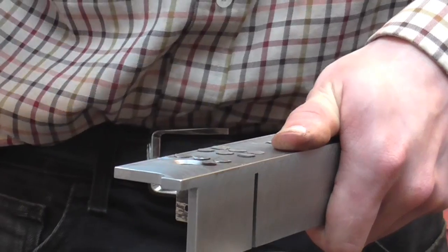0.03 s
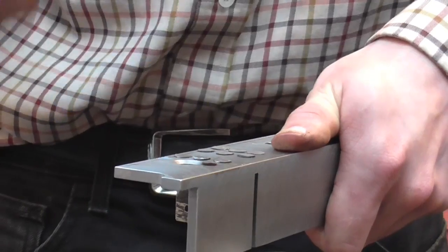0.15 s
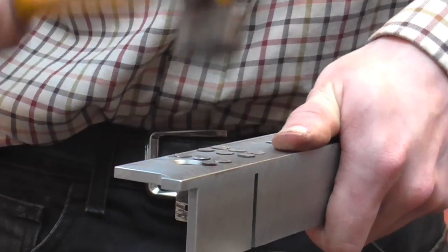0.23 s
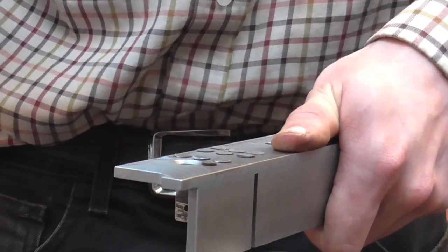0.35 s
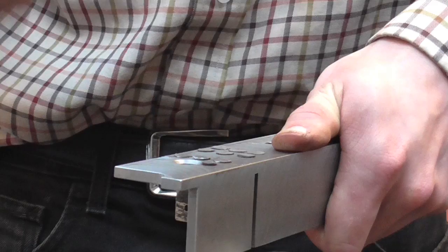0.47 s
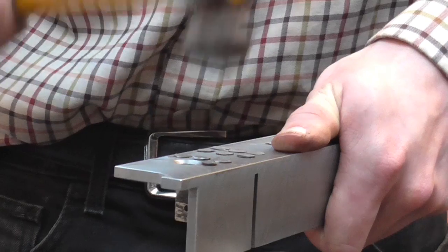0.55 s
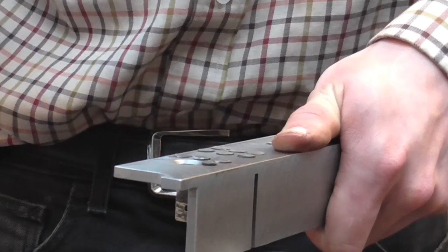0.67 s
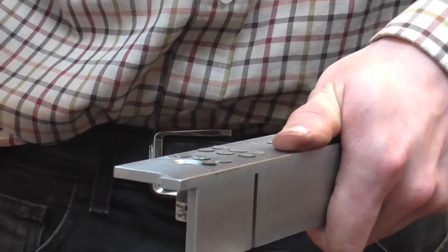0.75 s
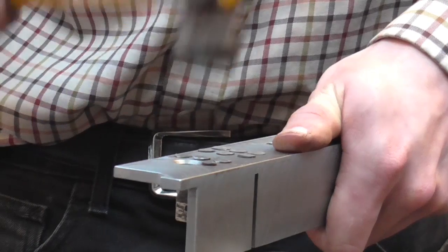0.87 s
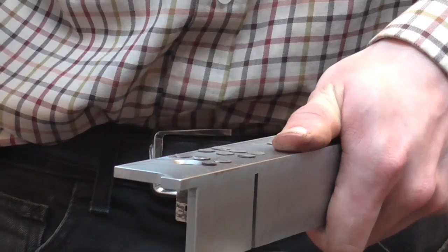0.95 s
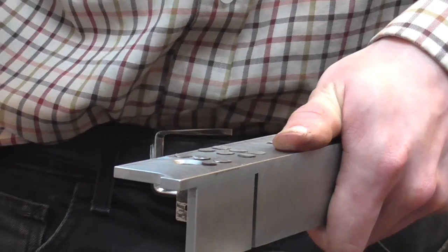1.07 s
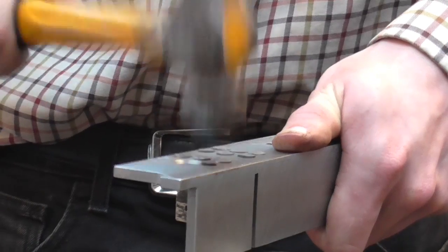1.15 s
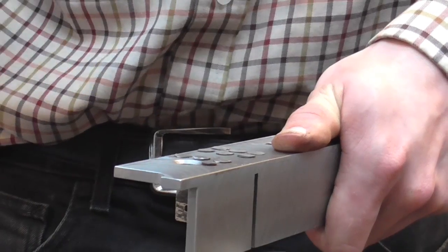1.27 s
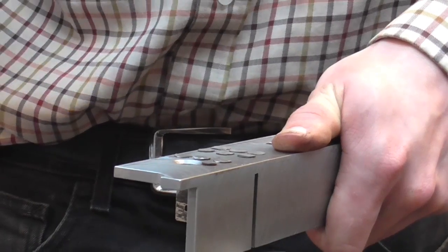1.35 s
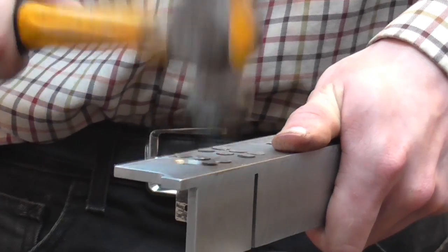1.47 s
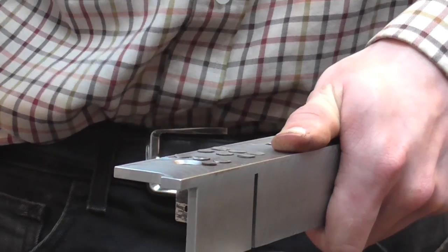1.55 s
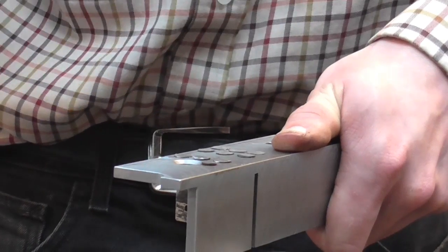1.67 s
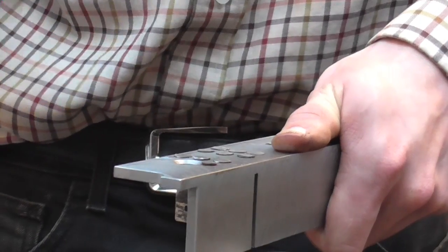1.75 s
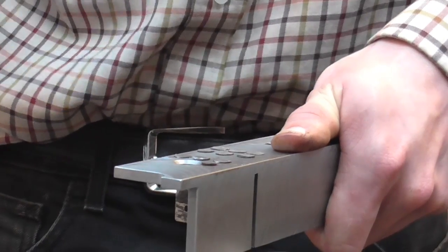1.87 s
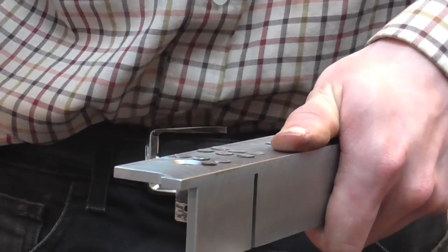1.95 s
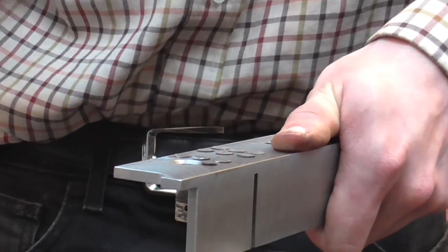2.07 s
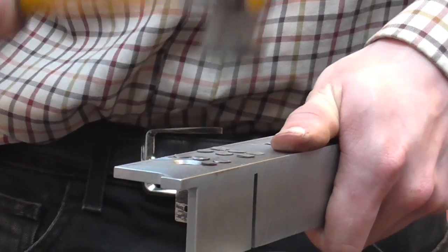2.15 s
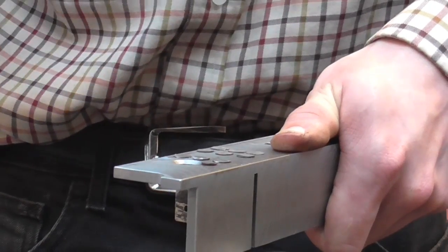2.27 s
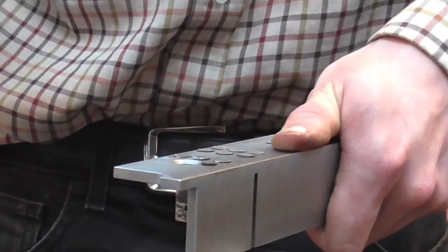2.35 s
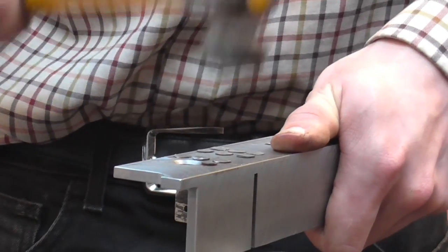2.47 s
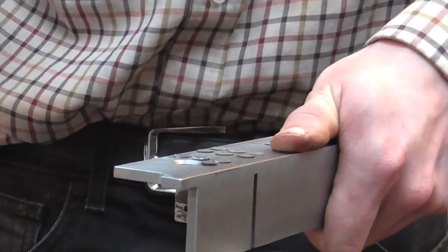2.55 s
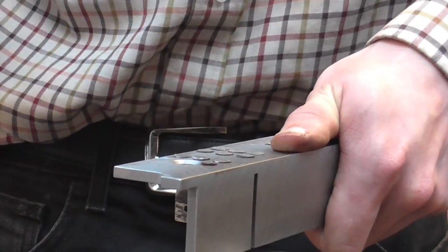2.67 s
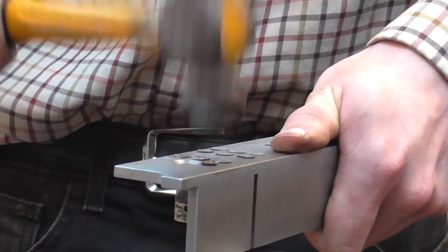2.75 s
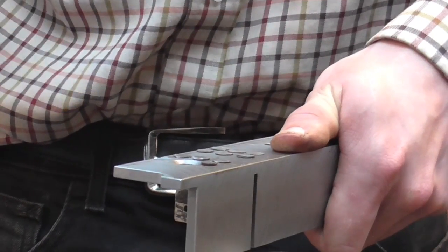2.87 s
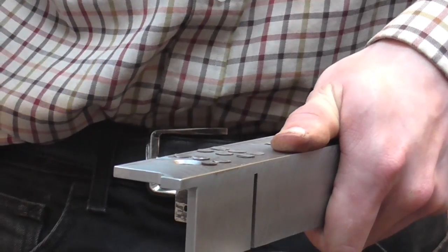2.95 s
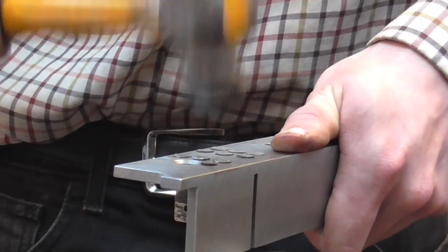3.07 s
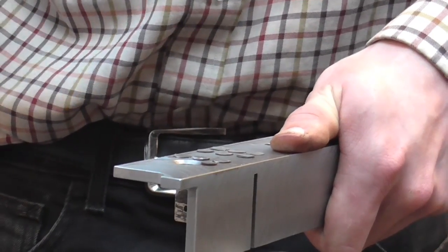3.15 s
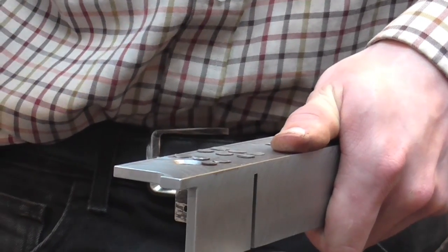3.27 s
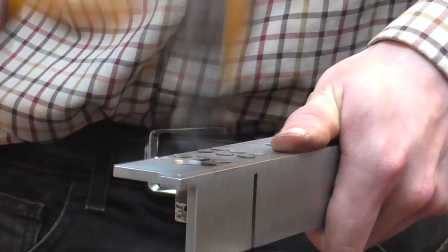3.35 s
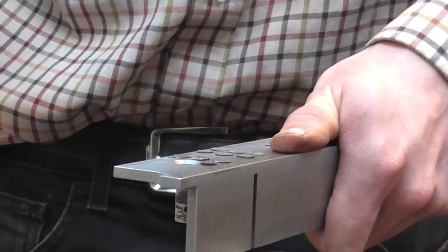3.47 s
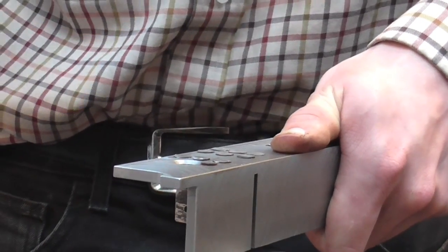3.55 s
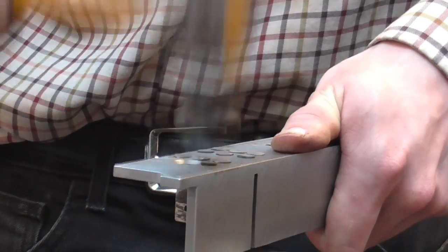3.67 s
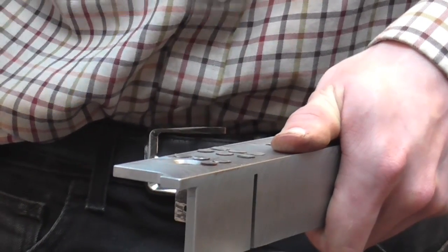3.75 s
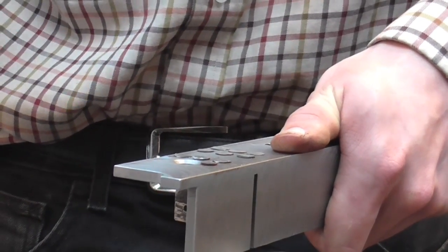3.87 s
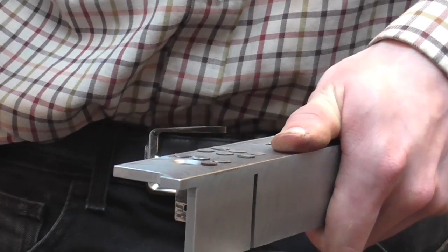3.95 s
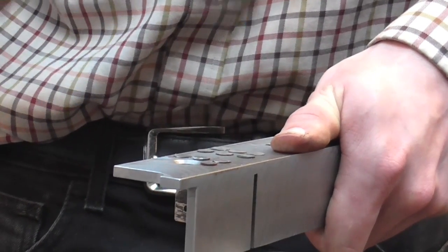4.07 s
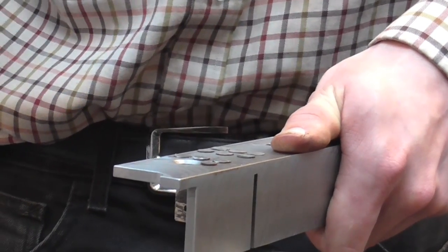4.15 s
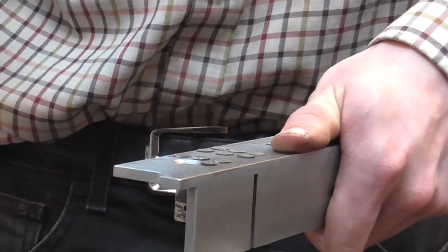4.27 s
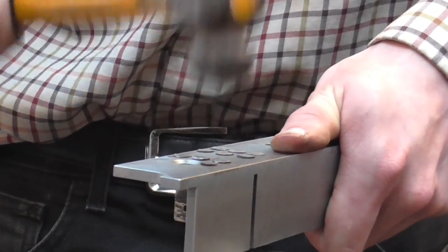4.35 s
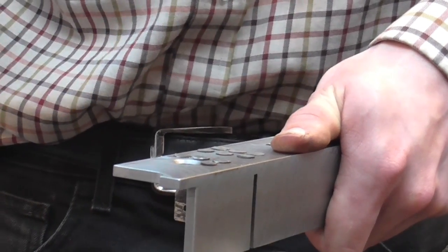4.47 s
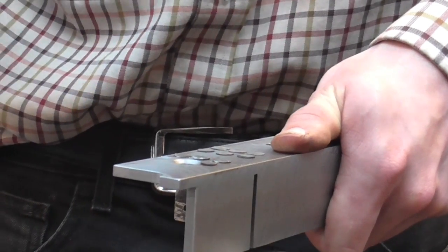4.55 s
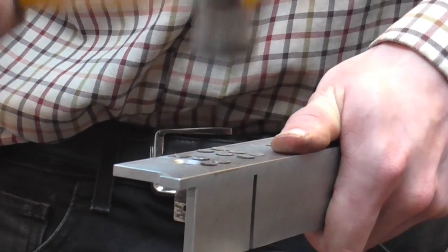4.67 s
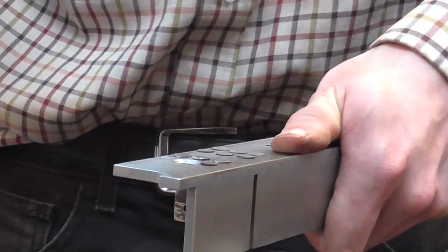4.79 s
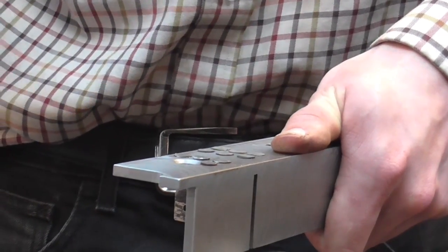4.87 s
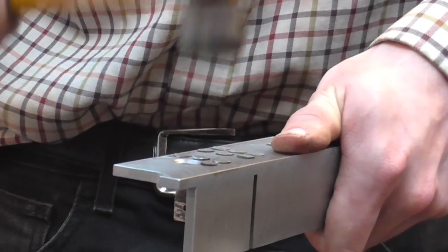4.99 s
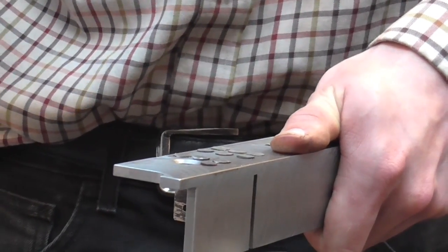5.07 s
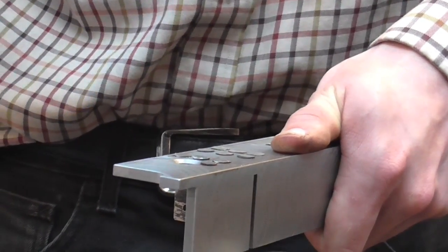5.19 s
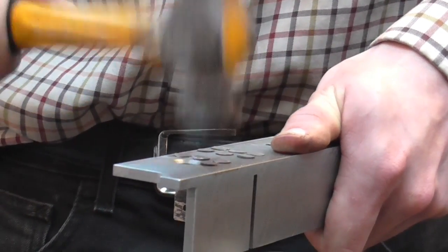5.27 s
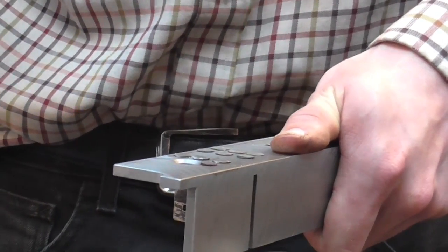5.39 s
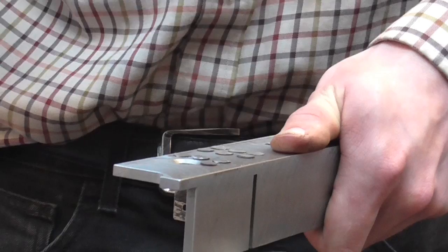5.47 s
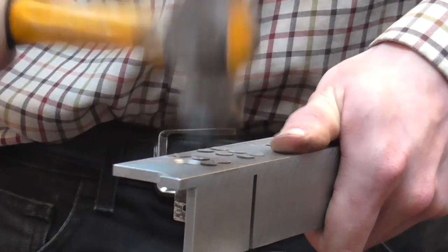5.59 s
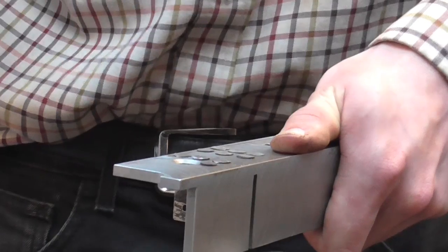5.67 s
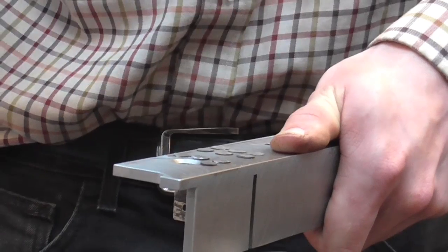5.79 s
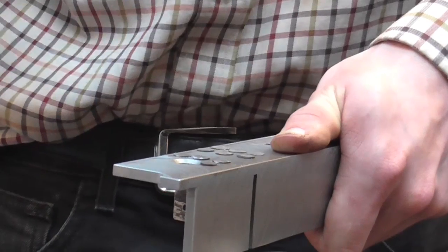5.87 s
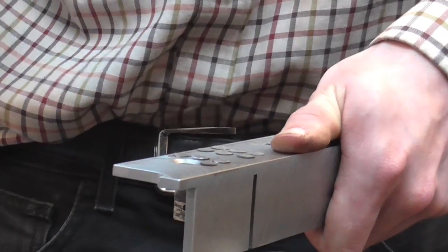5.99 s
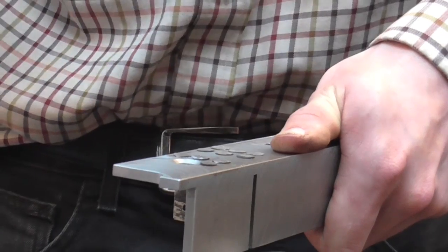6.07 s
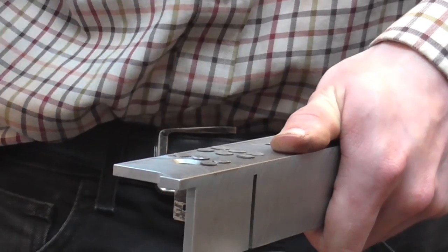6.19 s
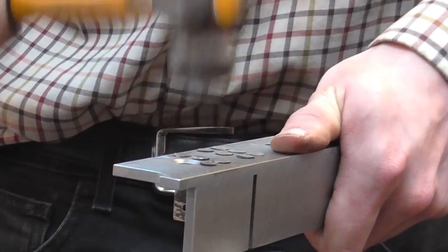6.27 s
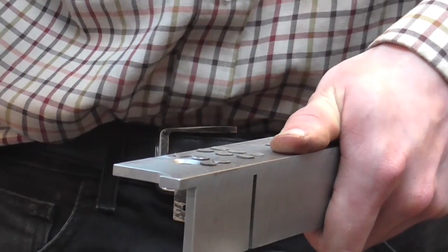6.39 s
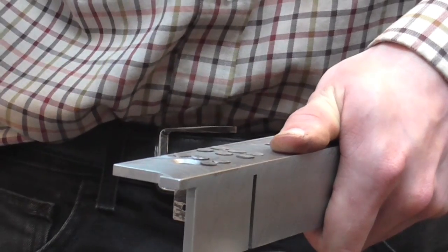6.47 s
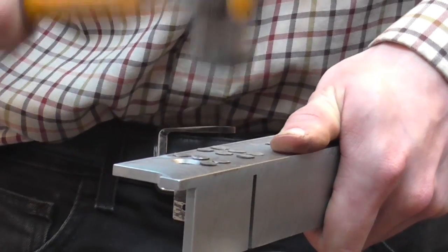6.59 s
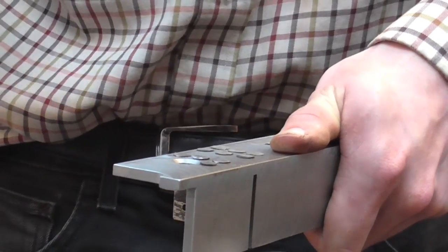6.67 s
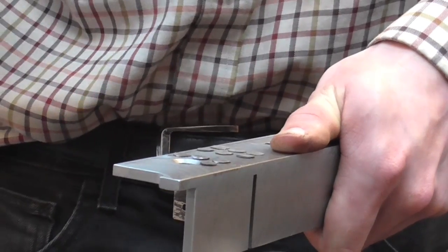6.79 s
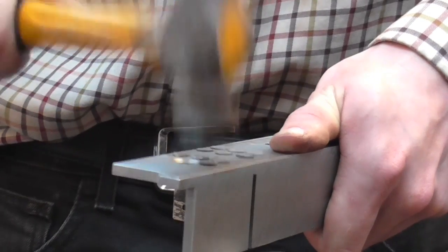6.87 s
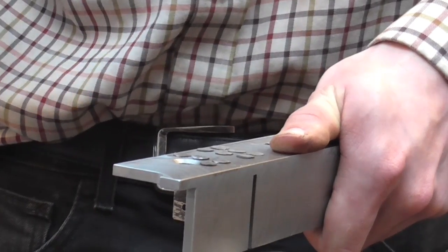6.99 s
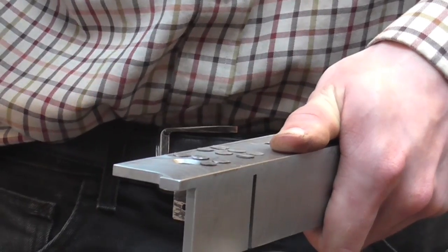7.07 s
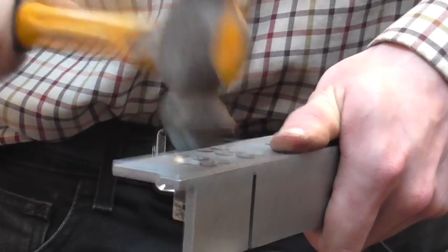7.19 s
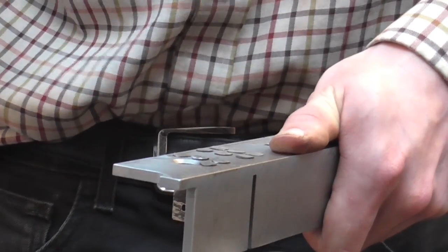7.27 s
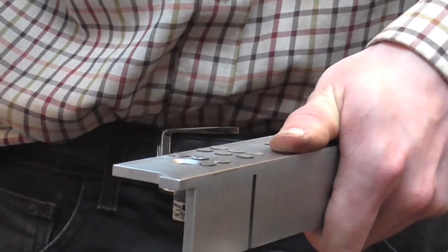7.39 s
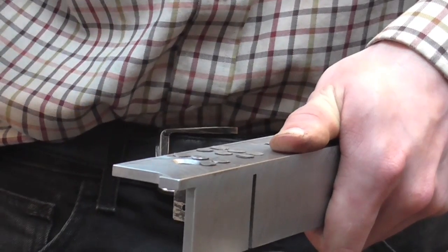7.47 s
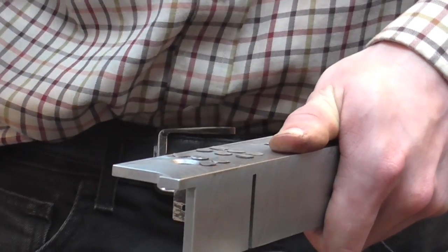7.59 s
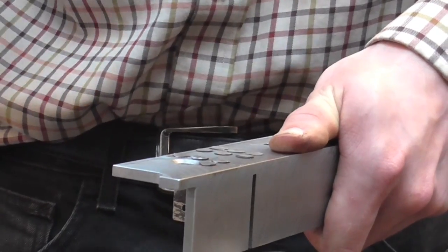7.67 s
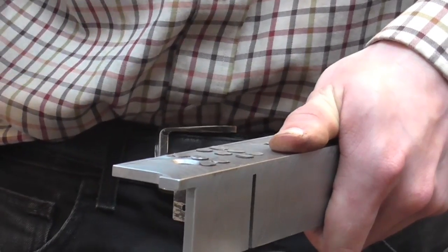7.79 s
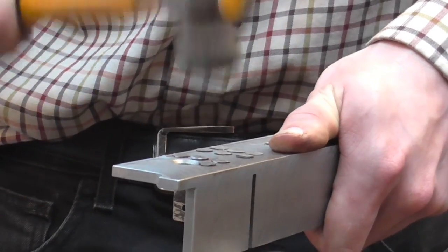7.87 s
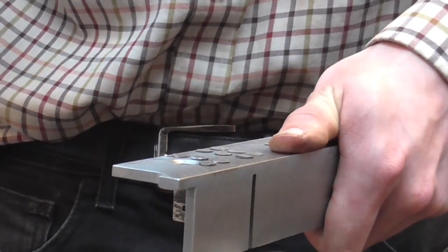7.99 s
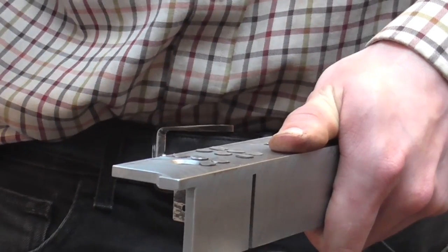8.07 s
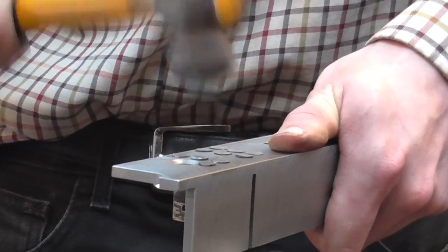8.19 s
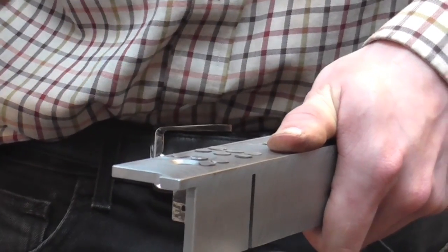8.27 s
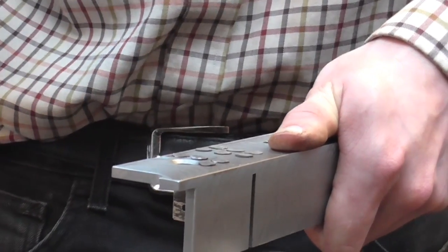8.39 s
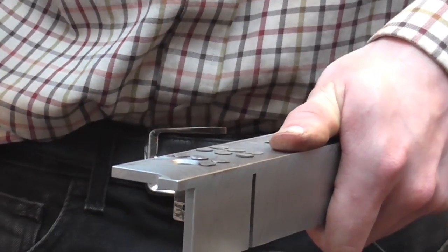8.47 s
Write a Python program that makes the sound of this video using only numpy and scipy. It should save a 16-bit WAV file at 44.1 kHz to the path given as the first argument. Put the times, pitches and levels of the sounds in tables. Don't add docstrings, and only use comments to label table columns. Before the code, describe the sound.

A small hammer strikes a rivet in a hand-held steel bracket with steady, even clacks, about three a second, in a small hard workshop.

```python
import sys
import numpy as np
from scipy import signal
from scipy.fft import rfft, irfft, next_fast_len
from scipy.io import wavfile
from scipy.ndimage import uniform_filter1d, minimum_filter1d, map_coordinates

SR = 44100
rng = np.random.default_rng(int(sys.argv[2]) if len(sys.argv) > 2 else 0)


def bounce(signal):
    frames = np.transpose(np.atleast_2d(signal))
    limited = np.clip(frames, -1, 1)
    pcm = np.round(limited * 32767).astype(np.int16)
    wavfile.write(sys.argv[1], SR, pcm)


def gain_from_db(level_db):
    decades = np.asarray(level_db, float) / 20
    return 10 ** decades


N = 376613
SPAN = 32768
HZ = np.fft.rfftfreq(SPAN, 1 / SR)
T = np.arange(SPAN) / SR
FADE = np.clip(3 - 4 * T / T[-1], 0, 1)

# start in seconds, thump level in
# dB, clank level in dB, edge level in dB.
HAMMER_BLOWS = [(-0.096, 1, -11.5, -22.5),
                (0.246, -2.5, -14.5, -17.5), (0.568, -3, -15, -18), (0.885, -3, -15.5, -21),
         (1.208, -4, -12.5, -18.5), (1.525, -4, -12, -18.5), (1.85, -3.5, -13.5, -18),
         (2.168, -5, -16.5, -18.5), (2.487, -5.5, -13, -19.5), (2.802, -4, -15, -18),
         (3.115, -5, -13, -16.5), (3.428, -4.5, -14, -22.5), (3.747, -5, -13, -17), (4.058, -3, -14.5, -18),
         (4.376, -4.5, -16, -18), (4.693, -5, -13.5, -17.5), (5.012, -4.5, -13.5, -16.5),
         (5.329, -5.5, -11.5, -17.5), (5.649, -5.5, -13, -19.5), (5.976, -5, -12.5, -16.5),
         (6.297, -2, -16.5, -21.5), (6.624, -6, -11.5, -18), (6.933, -4.5, -12, -18.5),
         (7.254, -4, -16.5, -19), (7.585, -4, -11.5, -17.5), (7.904, -5, -12, -17), (8.226, -4, -13.5, -17)]
# pitch in Hz, width in Hz, level in dB.
CONTACT = [(2970, 1600, -9.5), (4538, 390, 10), (6220, 1200, 9), (7830, 990, 7.5), (9960, 1400, 4),
           (14100, 11000, -8)]
# pitch in Hz, level in dB, t60 in seconds.
BRACKET = [(2606, -5, .11), (2972, -16, .14), (3445, -14, .13), (3575, -6, .16), (3623, -4, .15),
           (3709, -8, .14), (3876, -10, .1), (4167, -13, .14), (4425, -9, .12), (4495, -8, .1),
           (4576, -7, .15), (4680, -11, .13), (4785, -4.5, .14)]
# pitch in Hz, level in dB, t60 in seconds.
HEAD = [(5216, -16, .13), (5717, -9, .17), (5860, -13, .13), (6490, -8, .1), (6912, -11, .14),
        (6988, -12, .14), (7160, -14, .14), (7560, -10, .12), (8000, -14, .09), (10290, -15, .1)]
# pitch in Hz, level in dB, t60 in seconds.
FACE = [(9173, -11, .21), (9240, -13, .18), (9100, -14, .17)]
# pitch in Hz, level in dB, t60 in seconds.
LINGER = [(110, -42, 0.75), (2119, -42, .42), (4930, -61, 1.5)]
# pitch in Hz, width in Hz, level in dB.
BENCH = [(185.3, 72, -5), (332.4, 57, -1), (767, 37, -3), (972, 10, -10.5), (1230, 97, -1), (1358, 93, -3),
         (1696, 33, 0), (1858, 540, -7)]
# pitch in Hz, width in Hz, level in dB.
PUSH = [(467, 64, 4), (974, 840, 3.5), (1880, 4500, -5)]
# pitch in Hz, width in Hz, level in dB.
FLANK = [(150, 120, -17), (390, 340, -2), (960, 1100, 7)]
# frequency in Hz, level in dB.
REBOUND = [(300, -58), (500, -46), (850, -40), (1100, -50), (1600, -62), (3000, -100)]
# frequency in Hz, level in dB.
CLATTER = [(300, -9), (1000, 2), (2000, -0.5), (3200, 2), (5300, 1), (8000, -5), (12000, -16.5),
           (16000, -8)]
# left level in dB, right level in dB.
WALL_DB = [(0.5, -14), (-24, -12.5), (-10.5, -12.5), (-4.5, -3), (-14.5, -12), (-10, -18), (-12, -9),
           (-11.5, -18)]
WALL_S = [.0016, .0032, .0064, .0095, .0152, .02, .0285, .0305]
WALL_SIGN = [-1, 1, 1, 1, 1, 1, -1, 1]
# frequency in Hz, level in dB.
SIDEWAYS = [(100, -5.5), (400, -0.5), (1000, -2.5), (2500, -10.5), (5000, -20.5), (8000, -16), (14000, -11)]
# frequency in Hz, t60 in seconds.
ROOM_T60 = [(90, 0.53), (160, 0.22), (560, 0.24), (1470, 0.21), (3880, 0.21), (10200, 0.17), (16000, 0.099)]
# frequency in Hz, tail over direct sound in dB.
ROOM_DB = [(80, 12.5), (250, 11), (1000, 5), (4000, -11), (8000, -12), (11000, -16.5), (15000, -5.5)]
# frequency in Hz, likeness from 0 to 1.
ROOM_ALIKE = [(100, 0.93), (300, 0.98), (1000, 1), (2500, 0.67), (5000, 0.8), (8000, 0.2), (14000, 0.34)]
# start in seconds, level in dB.
SHELF_HUMS = [(-.07, -44.5), (0.299, -52.5), (0.602, -47.5), (.92, -51), (1.25, -51.5), (1.571, -43),
              (3.46, -50.5)]
# frequency in Hz, level in dB per Hz.
RUMBLE = [(25, -6), (80, -4.5), (108, 5.5), (140, -8.5), (300, -2.5), (1500, -17.5), (2200, -30.5),
          (16000, -55.5)]
# start in seconds, peak level in dB, pitch in Hz.
TICKS = [(0.0963, -44, 5510), (0.4805, -34.5, 6100), (0.7948, -42, 7210), (1.1013, -51, 6870),
         (1.7328, -43, 4690), (2.652, -55.5, 5900), (3.003, -47.5, 5270), (3.9546, -47, 7050),
         (4.2394, -42.5, 5930), (5.23, -42.5, 5600), (5.573, -56.5, 7250), (5.857, -41.5, 7210),
         (6.798, -54, 4560), (7.445, -40, 5330)]
# start in seconds, length in seconds, level in dB.
SLIDES = [(0.111, .12, -80), (2.66, .13, -83), (4.82, .19, -78.5), (8.43, 0.18, -71)]
# pitch in Hz, width in Hz, level in dB.
RUB = [(4500, 700, 0), (5900, 600, 1), (7700, 500, -6), (10500, 3000, -12)]
# frequency in Hz, level in dB.
MIC = [(20, -31), (80, 2), (200, -0.5), (12000, -2)]
# frequency in Hz, level in dB.
FRONT = [(15700, 0), (15900, -30), (16500, -50)]
# frequency in Hz, level in dB.
EDGE = [(20, -14), (50, -6), (100, 0), (16200, 0), (16900, -16), (17200, -70)]
# frequency in Hz, level in dB.
PORTS = [(20, 0), (60, 0), (100, -12), (300, -40)]

CLANK_REF_DB, EDGE_REF_DB = -13, -17
RING_DB, RING_PER_EDGE, TILT_PER_EDGE = 10, 0.6, 1.1
HEAD_DB, HEAD_PER_EDGE = 0.5, 0.27
FACE_DB, FACE_DB_PER_S = -8, 1.1
THUMP_DB = -1
BENCH_SCATTER_DB, STEEL_SCATTER_DB = 1.1, 1.3
SHELF_HZ, SHELF_S = 237, 0.135


def unit(x):
    return x / np.sqrt(np.mean(np.abs(x) ** 2) + 1e-20)


def along(points, hz):
    f, v = np.transpose(points)
    return np.interp(np.log(hz + 1), np.log(f + 1), v)


def causal(db):
    c = irfft(db * np.log(10) / 20)
    c[1:len(c) // 2] *= 2
    c[len(c) // 2 + 1:] = 0
    return np.exp(rfft(c))


def coloured(x, points):
    m = next_fast_len(N + SR // 4) // 2 * 2
    return irfft(rfft(x, m) * causal(along(points, np.fft.rfftfreq(m, 1 / SR))), m)[:, :N]


def highpass(hz):
    return (1j * HZ / (1j * HZ + hz)) ** 2


def add(track, s, spectrum):
    track[:, round((s + 1) * SR):][:, :SPAN] += FADE * irfft(spectrum, SPAN)


def resonances(peaks, scatter_db):
    total = 0
    for k, (centre, width, db) in enumerate(peaks):
        gain = (-1) ** k * gain_from_db(db + scatter_db * rng.standard_normal())
        damping = 1j * HZ * width
        total = total + gain * damping / (centre ** 2 - HZ ** 2 + damping)
    return total


def ringing(modes, scatter_db, detune, shorten, count=4):
    hz, db, t60 = np.transpose(modes)[:, :, None]
    luck = rng.standard_normal((4, len(hz), 1))
    t = T[:SPAN // count]
    decay = gain_from_db(db + scatter_db * luck[0] - 60 * t / (shorten * t60))
    ring = decay * np.sin(2 * np.pi * hz * (1 + detune * luck[1]) * t)
    beating = 1 + 0.55 * np.sin(2 * np.pi * 0.004 * hz * luck[2] * t + 2 * luck[3])
    onset = 1 - np.exp(-t / 0.0004)
    return rfft((ring * beating).sum(0) * onset * FADE[::count], SPAN)


def burst(t60):
    t = T[:512]
    x = rfft(rng.standard_normal(512) * gain_from_db(-60 * t / t60) * (1 - np.exp(-t / 0.0003)), SPAN)
    size = np.abs(x)
    flat = x / causal(20 * np.log10(size + 0.01 * size.max()))
    return rfft(irfft(flat) * gain_from_db(-60 * T / 0.06))


def tail():
    half = SPAN // 2
    hz, t, z = signal.stft(rng.standard_normal((2, half)), SR, nperseg=256)
    fall_db = -60 * t / along(ROOM_T60, hz)[:, None]
    beyond_db = 0.6 * fall_db - 27 - hz[:, None] / 900
    noise = signal.istft(z * (gain_from_db(fall_db) + gain_from_db(beyond_db)), SR, nperseg=256)[1][:, :half]
    noise = noise * (1 - np.exp(-T[:half] / 0.003))
    spectrum = rfft(noise / np.linalg.norm(noise[0]), SPAN)
    turn = np.arccos(np.clip(along(ROOM_ALIKE, HZ), -1, 1)) / 2
    mid, side = spectrum * causal(along(ROOM_DB, HZ)) * [np.cos(turn), np.sin(turn)]
    return np.array([mid + side, mid - side])


def walls():
    dull = 1 / (1 + 1j * HZ / 2000) ** 2
    echoes = 0
    for s, sign, db in zip(WALL_S, WALL_SIGN, WALL_DB):
        echoes = echoes + sign * gain_from_db(db)[:, None] * np.exp(-2j * np.pi * HZ * s)
    scatter = burst(t60=0.0026) * causal(along(SIDEWAYS, HZ)) * [[1], [-1]]
    return 1 + dull * echoes + scatter


def struck_steel(s, lost_db):
    bracket = ringing(BRACKET, STEEL_SCATTER_DB, detune=0.00062, shorten=0.5)
    head = ringing(HEAD, STEEL_SCATTER_DB, detune=0.0016, shorten=0.53)
    face = ringing(FACE, STEEL_SCATTER_DB, detune=0.0023, shorten=0.7)
    head = gain_from_db(HEAD_DB + HEAD_PER_EDGE * lost_db) * head
    face = gain_from_db(FACE_DB + FACE_DB_PER_S * s + lost_db) * face
    return gain_from_db(RING_DB + RING_PER_EDGE * lost_db - 24.5) * (bracket + head + face)


def lingering():
    middle, side = (ringing(LINGER, scatter_db=3, detune=0.0005, shorten=0.9, count=2) for _ in range(2))
    return gain_from_db(-10) * (middle + 0.4 * side * [[1], [-1]])


def rebound():
    puff = rng.standard_normal((2, SPAN)) * np.exp(-((T - 0.235) / 0.02) ** 2)
    knock = rfft(puff[0] + 3.6 * puff) * gain_from_db(along(REBOUND, HZ))
    return gain_from_db(-19 + 3.5 * rng.standard_normal()) * knock


def hammer():
    track = np.zeros((2, N + 2 * SR))
    same, near, rattle = tail(), walls(), tail()
    shift = np.clip(0.45 + 0.06 * np.log2(HZ / 1000 + 0.12), 0, 0.95)
    late = np.exp(-2j * np.pi * HZ * 0.00013) * [[1], [-1]]
    smear = burst(t60=0.0034)
    small, thin = highpass(110), highpass(900)
    clatter = thin * gain_from_db(13) * causal(along(CLATTER, HZ))
    for s, thump_db, clank_db, edge_db in HAMMER_BLOWS:
        force = gain_from_db(clank_db - CLANK_REF_DB)
        lost_db = edge_db - EDGE_REF_DB
        crack = resonances(CONTACT, scatter_db=1.02) * (smear + 0.75 * burst(t60=0.0018)) * thin
        crack = force * gain_from_db(17.5) * crack
        steel = force * struck_steel(s, lost_db)
        thump = gain_from_db(THUMP_DB + thump_db)
        bench = gain_from_db(28) * resonances(BENCH, BENCH_SCATTER_DB) + gain_from_db(22) * resonances(PUSH, BENCH_SCATTER_DB)
        bench = thump * bench
        flank = thump * gain_from_db(3.5) * resonances(FLANK, scatter_db=3) * late
        bright = causal(TILT_PER_EDGE * lost_db * np.log2(np.maximum(HZ / 4000, 1)))
        fresh = tail()
        room, rattled = (np.sqrt(1 - shift ** 2) * old + shift * fresh for old in (same, rattle))
        close = (crack + steel + bench) * near + flank
        far = (crack + steel + gain_from_db(-9) * (bench + flank)) * room + force * clatter * rattled
        add(track, s + 0.0006, (close + far) * small * bright + lingering())
        add(track, s, rebound())
    return track[:, SR:SR + N]


def shelf():
    t = np.arange(N) / SR
    swell = 0
    for s, db in SHELF_HUMS:
        middle = s + SHELF_S / 2
        swell = swell + gain_from_db(db) * np.exp(-((t - middle) / SHELF_S * 2) ** 4)
    return swell * np.sin(2 * np.pi * SHELF_HZ * t)


def workshop_air():
    noise = rng.standard_normal((3, N))
    swell_db = 2 * map_coordinates(rng.standard_normal(60), [np.linspace(0, 59, N)])
    return gain_from_db(-67) * gain_from_db(swell_db) * unit(coloured(noise[0] + 0.49 * noise[1:], RUMBLE))


def loose_clip():
    track = np.zeros((2, N + 2 * SR))
    heard = highpass(3000) * (1 + gain_from_db(-11.5) * tail())
    for s, db, hz in TICKS:
        modes = [(hz, -3, .007), (4600, -6, .005), (5400, -4, .006),
                 (7300, 0, .005), (5950, -4, .006), (8300, -8, .004)]
        tick = ringing(modes, scatter_db=1.5, detune=0.018, shorten=0.94, count=32)
        add(track, s, gain_from_db(db + 2) * tick * heard)
    return track[:, SR:SR + N]


def creep():
    track = np.zeros((2, N + 2 * SR))
    for s, length, db in SLIDES:
        noise = rng.standard_normal((2, SPAN))
        rub = unit(irfft(rfft(noise[0] + 0.6 * noise) * resonances(RUB, STEEL_SCATTER_DB)))
        swell = np.sin(np.pi * np.clip(T / length, 0, 1))
        add(track, s, rfft(gain_from_db(db) * rub * swell))
    return track[:, SR:SR + N]


def scene():
    pan = gain_from_db([[-0.3], [0.3]])
    return pan * (hammer() + shelf() + loose_clip() + creep()) + workshop_air()


def low_pass(x):
    return signal.sosfilt(signal.butter(12, 17140, fs=SR, output="sos"), x)


def record(dry):
    x = coloured(dry, MIC + FRONT)
    x = x / (1 + np.abs(x / 0.44) ** 4) ** (1 / 4)
    coming = -minimum_filter1d(-np.abs(x), size=193, origin=-96)
    noise = rng.standard_normal(N) + 0.3 * rng.standard_normal(x.shape)
    hiss = coloured(noise, [(2000, -33), (4000, -12.5), (15500, -15), (16000, -37)])
    x = x + gain_from_db(-42) * uniform_filter1d(coming, size=64) * hiss
    stirring = gain_from_db(-81) * unit(coloured(rng.standard_normal(x.shape), PORTS))
    return low_pass(coloured(x, EDGE) + stirring)


dry = scene()
out = record(dry)
bounce(out)
```